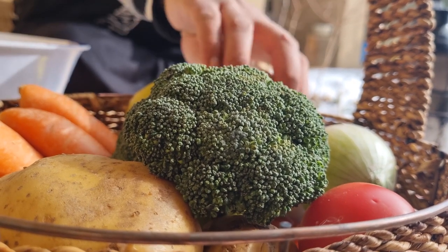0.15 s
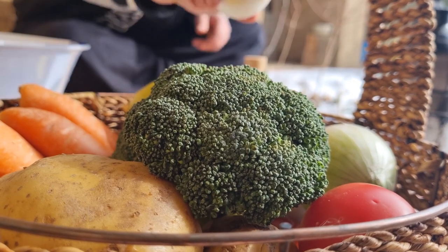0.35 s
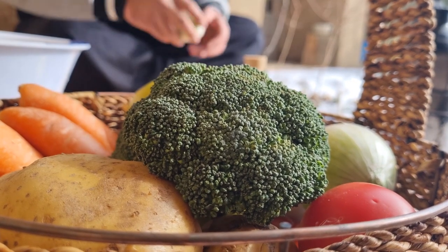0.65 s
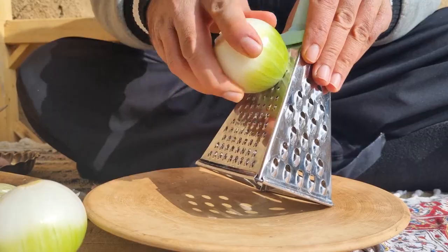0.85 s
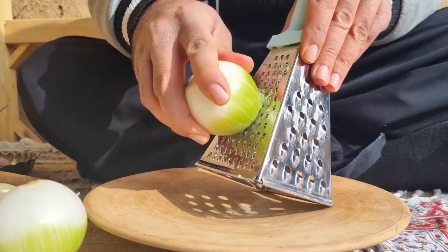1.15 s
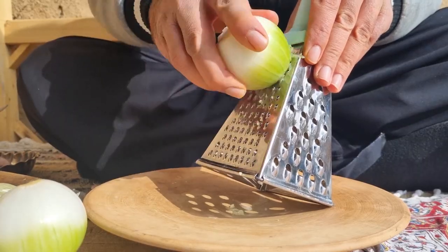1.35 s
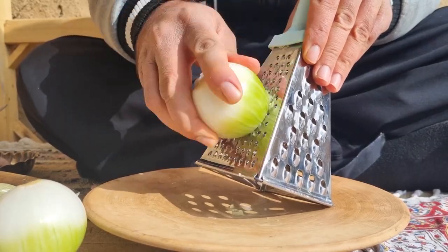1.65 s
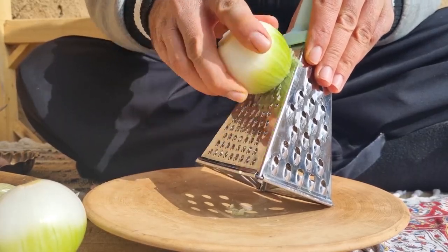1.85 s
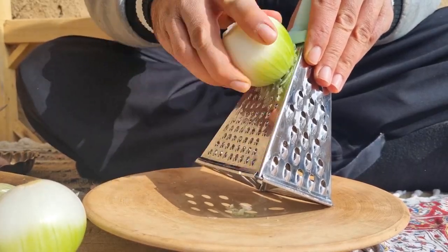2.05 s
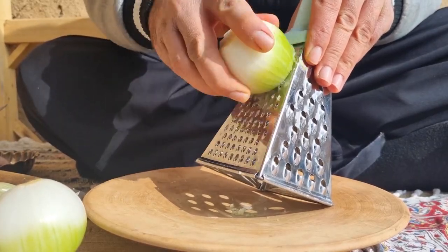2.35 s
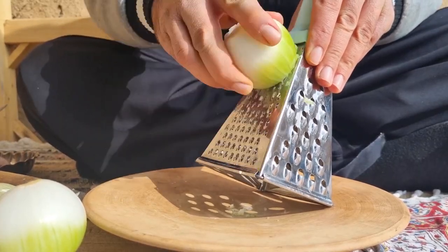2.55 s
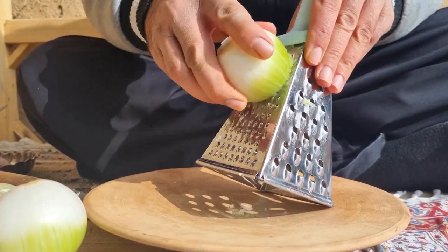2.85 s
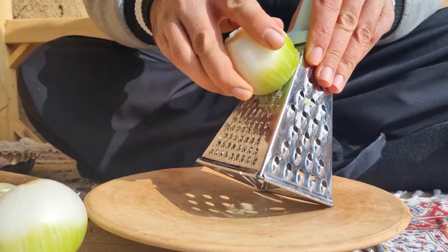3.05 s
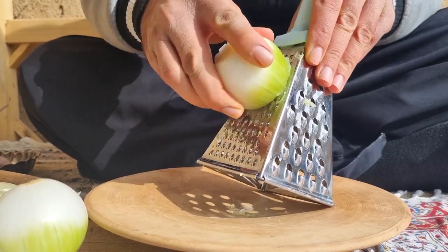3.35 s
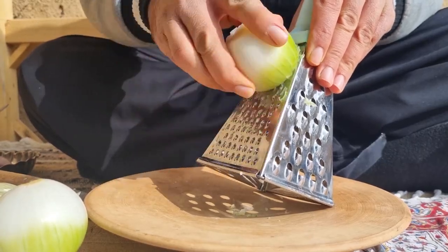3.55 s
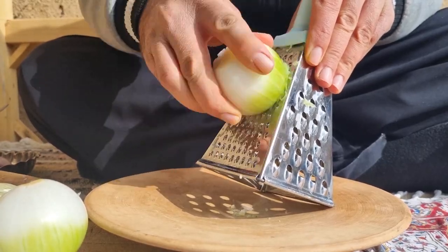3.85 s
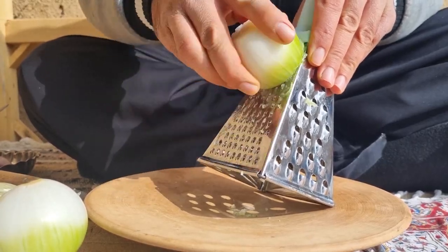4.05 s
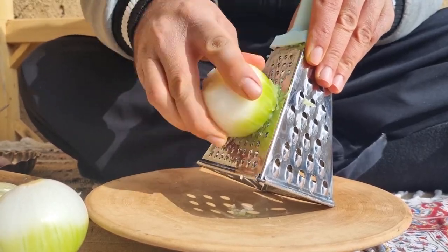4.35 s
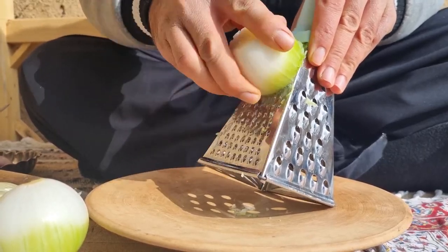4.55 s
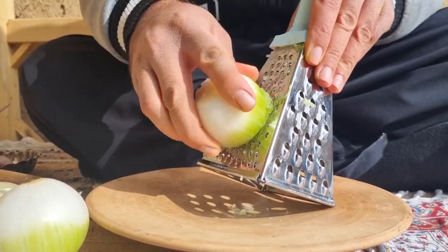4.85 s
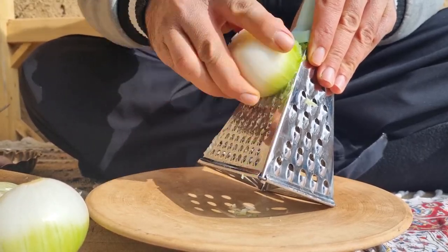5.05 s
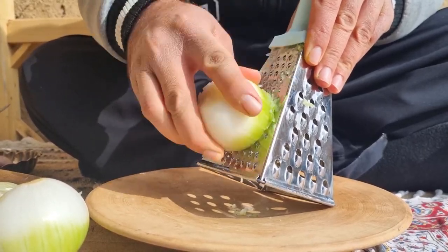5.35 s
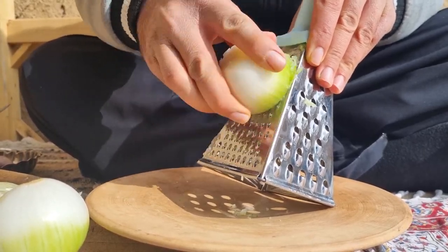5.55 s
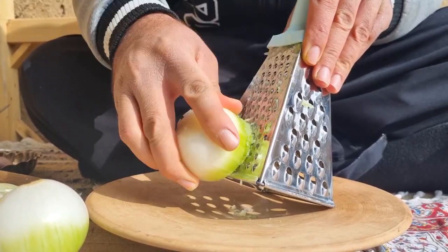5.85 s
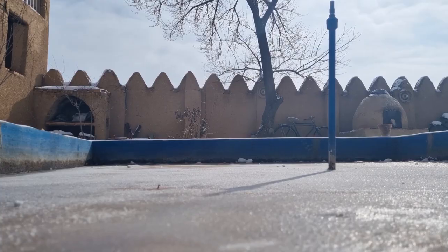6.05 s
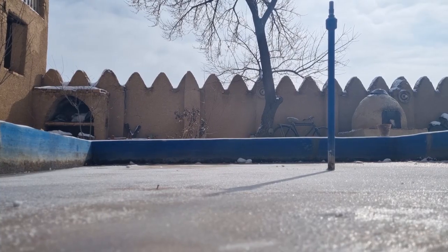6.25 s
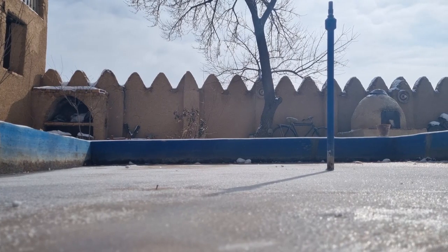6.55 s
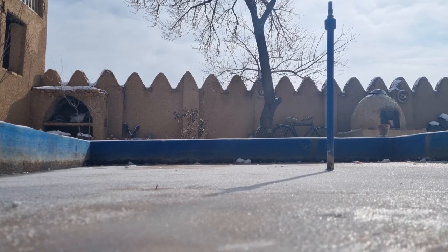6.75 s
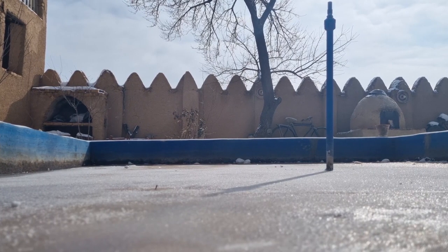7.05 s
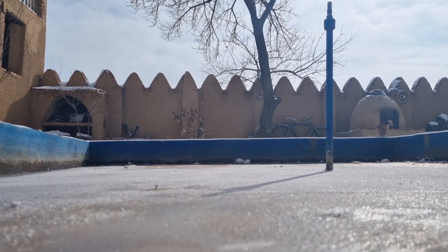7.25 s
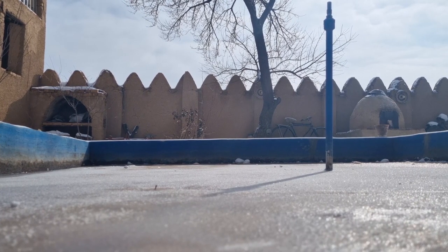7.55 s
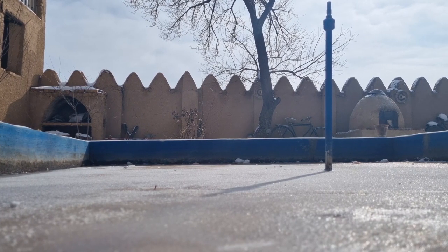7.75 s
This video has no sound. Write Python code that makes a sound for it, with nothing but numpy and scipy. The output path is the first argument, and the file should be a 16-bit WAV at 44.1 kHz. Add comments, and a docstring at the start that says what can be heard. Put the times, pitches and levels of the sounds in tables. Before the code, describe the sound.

For the first 0.9 seconds, vegetables are handled in a basket with a few light taps, dull knocks and small rustles, the clearest near 0.2 seconds, over a very quiet outdoor background. At about 0.9 seconds, much louder grating cuts in, close to the microphone. An onion is rubbed down and up a steel box grater in a steady rhythm of about four pushes a second, each followed by a lighter return. Every stroke is a short, dense, wet rasping hiss, with some ring from the metal and a hollow note from inside the box. A wooden plate underneath rocks with soft low thuds. Just before 6 seconds the close grating cuts off. The same rhythm continues very faintly and far away as dull swells of rumble and hiss, dying out at around 7.7 seconds over a soft outdoor rumble.

```python
"""Light taps and rustles come first, from vegetables handled in a basket over a quiet outdoor floor.
Then the sound of an onion rubbed down and up a steel box grater cuts in mid-stroke, close to a phone.
Teeth tear the flesh in a dense hiss, the sheet and the air in the box resonate, and the wooden plate
beneath rocks. The close sound cuts out, and the same rhythm goes on faint and far."""
import sys
import numpy as np
from scipy import signal
from scipy.fft import rfft, irfft
from scipy.io import wavfile
from scipy.ndimage import uniform_filter1d

SR = 44100
rng = np.random.default_rng(int(sys.argv[2]) if len(sys.argv) > 2 else 0)


def wav_record(signal):
    """Record a signal, one row per channel, as 16-bit PCM in the file named by sys.argv[1]."""
    frames = np.transpose(np.atleast_2d(signal))
    bounded = np.clip(frames, -1, 1)
    # unit amplitude maps onto the largest positive 16-bit level
    quanta = np.round(bounded * 32767).astype(np.int16)
    wavfile.write(sys.argv[1], SR, quanta)


N = 348390
CUT_IN_S, CUT_OUT_S = .8818, 5.953  # span of the close grating


def undb(db):
    """Amplitude ratio of a level in decibels."""
    return np.exp(np.asarray(db) * (np.log(10) / 20))


def level(x, db):
    """Normalisation to an rms level."""
    return x * undb(db) / np.sqrt(np.mean(x ** 2))


def over_hz(points):
    """Frequency response: the gain of (Hz, dB) points at every FFT bin."""
    hz, db = np.transpose(points)
    return undb(np.interp(np.log(np.fft.rfftfreq(N, 1 / SR) + 1), np.log(hz), db))


def colour(x, points):
    """Spectral shaping, scaled to rms 1."""
    return level(irfft(rfft(x) * over_hz(points), N), 0)


def bands(x, centres_hz):
    """Complementary filtering: neighbouring bands that add up to the sound."""
    spectrum, octave = rfft(x), np.log2(np.fft.rfftfreq(N, 1 / SR) + 1)
    return [irfft(spectrum * np.interp(octave, np.log2(centres_hz), one), N)
            for one in np.eye(len(centres_hz))]


def ring(x, modes):
    """Modal superposition: parallel resonators of alternating sign, scaled to rms 1."""
    out = np.zeros(N)
    for k, (hz, width, db) in enumerate(modes):
        mode = signal.lfilter(*signal.iirpeak(hz, hz / width, SR), x)
        out += (-1) ** k * undb(db) * mode / np.sqrt(width)
    return level(out, 0)


def walk(per_s):
    """Random modulation: ramps between random values, with a spread near 1."""
    hold = int(SR / per_s)
    return 1.33 * uniform_filter1d(np.repeat(rng.standard_normal(N // hold + 1), hold), hold)[:N]


def clicks(per_s, spread_db):
    """Shot noise: clicks of uneven size at random times, as when cells burst."""
    bursts = rng.random(N) < per_s / SR
    return bursts * rng.standard_normal(N) * undb(spread_db * rng.standard_normal(N))


# Stereo width. Each row: frequency in Hz, gain of the side signal in dB.
SIDE_GAIN = [(100, -19), (700, -14.5), (1400, -4.5), (4400, -4), (8000, 1.5)]
# Stereo balance. Each row: frequency in Hz, left minus right in dB.
BALANCE = [(200, 2), (2400, 0.55), (4400, -1.5), (15000, -2)]

def ports(mid, side):
    """Spatial coherence: two microphone ports are alike in the bass, unrelated in the treble."""
    m, s = rfft(mid), rfft(side) * over_hz(SIDE_GAIN)
    lean = np.sqrt(over_hz(BALANCE))
    return irfft(np.array([(m + s) * lean, (m - s) / lean]), N)


def swings(t, jolts, swell_s, t60):
    """Damped oscillation: each jolt swells a low swing that dies away or is stopped by the next."""
    out, signs = np.zeros(N), rng.choice([-1, 1], len(jolts))
    following = [jolt[0] for jolt in jolts[1:]] + [t[-1]]
    for (s, db, hz), sign, next_s in zip(jolts, signs, following):
        near = slice(int((s - 2 * swell_s) * SR), int((s + t60) * SR))
        age = t[near] - t[near][0]
        swell = (1 - np.exp(-age / swell_s)) ** 2 * undb(-60 * age / t60)
        stopped = np.clip((next_s - t[near]) / (2 * swell_s), 0, 1)
        envelope = undb(db) * np.sqrt(2) * swell / swell.max() * stopped
        out[near] += sign * envelope * np.sin(2 * np.pi * hz * age)
    return out


# Taps on the vegetables. Each row: start in seconds, knock in dB, rustle in dB,
# seconds for the rustle to fall 20 dB.
BASKET_TAPS = [(0, -83, -62.5, 0.12), (0.092, -63.5, -71, 0.11), (0.184, -44, -60, 0.12),
               (0.269, -70, -66, 0.098), (.449, -83, -63, 0.088), (0.836, -86.5, -62, 0.043)]
# Jolts of the basket. Each row: time in seconds, level in dB, pitch in Hz.
BASKET_JOLTS = [(.075, -59, 70), (0.113, -46, 99), (0.204, -47, 93), (0.258, -40, 95.5), (0.338, -40, 85),
                (.38, -46, 50)]

def handling(t):
    """Impact and friction: taps give a dull knock and a rustle of skin, jolts swing the basket."""
    knock, rustle = np.zeros((2, N))
    for start, knock_db, rustle_db, rustle_s in BASKET_TAPS:
        age = np.maximum(t - start, 0)
        knock += undb(knock_db - 60 * age / 0.18) * (age > 0)
        rustle += undb(rustle_db - 20 * age / rustle_s) * (1 - np.exp(-age / 0.0023))
    # Spectra. Each row: frequency in Hz, relative level in dB.
    wood = [(60, -21.5), (200, 12.0), (400, 4), (700, -1), (1600, -8.0), (5000, -46.0)]
    skin = [(500, -53), (2000, -13), (3600, -1.5), (7500, -1.5), (9500, -18), (15000, -7.5)]
    mid, side = (knock * colour(rng.standard_normal(N), wood)
                 + rustle * colour(clicks(per_s=7900, spread_db=0.5), skin) for _ in range(2))
    return ports(mid + swings(t, BASKET_JOLTS, swell_s=0.0103, t60=0.14), side)


# Spectrum of the outdoor floor. Each row: frequency in Hz, relative level in dB.
AIR_SPECTRUM = [(20, -5), (44, -0.5), (113, -13), (460, -23.5), (9100, -30.5), (14300, -25), (16000, -22.5)]
# Its course. Each row: time in seconds, rumble gain in dB, hiss gain in dB.
AIR_GAINS = [(0, -56, -67), (.5, -64.5, -69), (5.96, -64, -69.5), (7.7, -52.5, -69.5), (7.9, -56.5, -72.5)]

def air(t):
    """Noise floor: a wavering outdoor rumble and thin microphone hiss."""
    times, rumble_db, hiss_db = np.transpose(AIR_GAINS)
    rumble_gain = undb(np.interp(t, times, rumble_db) + 2.3 * walk(3.4))
    hiss_gain = undb(np.interp(t, times, hiss_db) + .8 * walk(13))
    noises = (bands(colour(rng.standard_normal(N), AIR_SPECTRUM), [100, 400]) for _ in range(2))
    mid, side = (rumble_gain * low + hiss_gain * high for low, high in noises)
    return ports(mid, side)


# Strokes down, against the teeth. Each row: grip and release in seconds, hiss in dB,
# rocking of the plate at the catch and at the stop in dB.
DOWN_STROKES = [(0.942, 1.031, -21.5, -21, -17), (1.208, 1.284, -21, -25, -14.5),
                (1.452, 1.535, -22, -24.5, -21), (1.703, 1.785, -22.5, -30, -18.5),
                (1.956, 2.035, -21.5, -14.5, -15.5), (2.199, 2.284, -22, -16.5, -21.5),
                (2.446, 2.536, -23.5, -13.5, -24), (2.694, 2.787, -22.5, -20.5, -21),
                (2.947, 3.022, -22.5, -25.5, -26), (3.192, 3.273, -22, -29, -17),
                (3.43, 3.525, -23, -20.5, -18.5), (3.685, 3.769, -22.5, -19.5, -20.5),
                (3.931, 4.015, -22.5, -18.5, -17), (4.172, 4.256, -22, -20.5, -24),
                (4.414, 4.493, -22.5, -19.5, -20.5), (4.656, 4.744, -22, -18, -20),
                (4.908, 4.997, -23, -18.5, -17), (5.153, 5.233, -24, -23, -19.5),
                (5.393, 5.476, -24.5, -18, -27.5), (5.64, 5.715, -23, -16.5, -21.5),
                (5.873, 5.946, -22, -25, -25)]
# Lighter strokes up. Each row: grip and release in seconds, hiss in dB, rocking at the turn in dB.
UP_STROKES = [(0.879, 0.905, -23.5, -30.5), (1.076, 1.17, -30.5, -35), (1.334, 1.41, -25, -25),
              (1.586, 1.659, -27, -29.5), (1.838, 1.916, -28.5, -30.5), (2.084, 2.16, -28, -32.5),
              (2.327, 2.408, -28.5, -27), (2.582, 2.656, -30, -32), (2.828, 2.905, -27.5, -32.5),
              (3.069, 3.149, -28.5, -32.5), (3.326, 3.396, -29.5, -32), (3.561, 3.645, -27.5, -32),
              (3.812, 3.887, -26.5, -28.5), (4.059, 4.125, -26.5, -18.5), (4.303, 4.37, -27.5, -21.5),
              (4.537, 4.613, -28, -32), (4.782, 4.863, -27, -34), (5.036, 5.11, -28, -24),
              (5.28, 5.348, -27, -27), (5.523, 5.597, -31.5, -33), (5.759, 5.835, -30, -28.5)]

def strokes():
    """Reciprocating motion: pushes and returns in order of time."""
    # Each row: grip and release in seconds, hiss, its change over the stroke and sheet drive
    # over hiss in dB, knock delay in seconds, knock in dB.
    down = [(*row[:3], -1.5, -3.3, 0.028, 4) for row in DOWN_STROKES]
    up = [(*row[:3], -0.7, -6, 0.014, 5) for row in UP_STROKES]
    return sorted(down + up)


def pressure(t):
    """Contact force drives hiss and sheet: the onion slides in, the teeth bite, hold and let go."""
    hiss, sheet = np.zeros((2, N))
    for grip, release, hiss_db, fade_db, sheet_db, knock_s, knock_db in strokes():
        near = slice(int((grip - .06) * SR), int((release + .06) * SR))
        s, quarter = t[near], (release - grip) / 4
        bite_db = -2.5 * (1 + np.tanh((grip - s) / 0.00082)) - 5 * np.logaddexp(0, (grip - s) / 0.0058)
        hold_db = hiss_db + fade_db * np.interp(s, [grip + quarter, release - quarter], [-.5, .5])
        let_go_db = -9 * np.logaddexp(0, (s - release) / 0.0063)
        stroke_db = bite_db + hold_db + let_go_db
        hiss[near] += undb(stroke_db)
        rise_db = 0.7 * (grip - CUT_IN_S)  # the sheet gains on the hiss as the grating goes on
        catch_db = knock_db * np.exp(-((s - grip - knock_s) / .013) ** 2)  # the first teeth knock it
        sheet[near] += undb(stroke_db + sheet_db + rise_db + catch_db)
    return hiss, sheet


def steel(x, t60):
    """Dense modes act as a decaying noise response, new for each stroke as the onion's place differs."""
    age = np.arange(int(t60 * SR)) / SR
    tails = rng.standard_normal((len(strokes()), len(age))) * undb(-60 * age / t60)
    turns = [0] + [int(stroke[1] * SR) for stroke in strokes()[:-1]] + [int(CUT_OUT_S * SR)]
    out = np.zeros(N)
    for a, b, tail in zip(turns, turns[1:], tails):
        out[a:b + len(tail) - 1] += signal.fftconvolve(x[a:b], tail / np.sqrt(np.sum(tail ** 2)))
    return out


# Spectrum of tearing flesh. Each row: frequency in Hz, relative level in dB.
TEAR_SPECTRUM = [(530, -28), (900, -7), (1470, -9.5), (1640, -16.5), (1850, -6.5), (2470, -11.5),
                 (3000, -5.5), (4460, -2.5), (7580, -6.5), (8980, -13), (11400, -15), (15100, -9.5),
                 (16000, -19)]

def tearing(drive, band_gains):
    """Fracture noise: bursting cells merge into a hiss that rings on in the steel."""
    cells = colour(clicks(per_s=30000, spread_db=0.5), TEAR_SPECTRUM) * drive
    centres_hz = np.geomspace(1000, 14000, len(band_gains))
    tear = sum(gain * band for gain, band in zip(band_gains, bands(cells, centres_hz)))
    return undb(-0.5) * (tear + 0.5 * steel(tear, t60=.06))


# Low modes of the steel sheet. Each row: frequency in Hz, bandwidth in Hz, relative level in dB.
SHEET_MODES = [(245.8, 33, -1.5), (323.8, 52, -2), (435, 110, -9.5), (635, 230, -7), (812.4, 35, -5.5),
               (940, 76, -7), (1175, 95, -16)]

def sheet_ring(drive):
    """Impulse excitation: the tearing rings the bending modes of the sheet."""
    return level(ring(clicks(per_s=3000, spread_db=3.5) * drive, SHEET_MODES), -32)


# Air mode of the box. The row: frequency in Hz, bandwidth in Hz, relative level in dB.
BOX_MODE = [(525, 27, 0)]
# Shreds fill the box and dull it. Each row: time in seconds, gain in dB.
BOX_GAIN = [(1, -32), (5, -37)]

def box_air(t, drive):
    """Cavity resonance: the air inside the box answers the tearing with a hollow note."""
    hollow = ring(clicks(per_s=660, spread_db=4.5) * drive, BOX_MODE)
    return hollow * undb(np.interp(t, *np.transpose(BOX_GAIN)))


# Modes of the wooden plate. Each row: frequency in Hz, bandwidth in Hz, relative level in dB.
PLATE_MODES = [(54, 12, -6.5), (74, 25, -2.5), (99.5, 36, 2), (147.7, 48, -3)]

def plate_shake(drive):
    """Forced vibration: the drag shakes the plate."""
    return level(ring(rng.standard_normal(N) * (drive + undb(-42)), PLATE_MODES), -29.5)


def plate_rock(t, catch_hz=104.6, stop_hz=101.4, turn_hz=97, spread_hz=6.0):
    """Free vibration: the plate tips when a push catches, when it stops and when the hand turns."""
    catches = [(grip + 0.018, db, catch_hz) for grip, _, _, db, _ in DOWN_STROKES]
    stops = [(release - 0.013, db, stop_hz) for _, release, _, _, db in DOWN_STROKES]
    turns = [(release + 0.008, db, turn_hz) for _, release, _, db in UP_STROKES]
    thuds = [(s, db, hz + spread_hz * rng.standard_normal())
             for s, db, hz in sorted(catches + stops + turns)]
    return swings(t, thuds, swell_s=.006, t60=0.2)


def grater(t):
    """Source and resonators: the same strokes drive the tearing, the sheet, the box and the plate."""
    hiss, sheet = pressure(t)
    tear_drive = hiss * undb(0.91 * walk(70))  # rows of teeth catch unevenly
    # Wet clumps shift the colour as they pass; as the onion slows, the treble dies first.
    band_gains = [undb(1.4 * walk(25)) * (hiss * undb(25.5) + 1e-4) ** tilt
                  for tilt in np.linspace(-.15, .15, 6)]
    sheet_drive = sheet * undb(2.0 * walk(30))  # the sheet is shaken in jerks
    # The box speaks unevenly, and almost as readily on the light return as on the push.
    box_drive = sheet ** 0.63 * undb(1.7 * walk(22)) * (hiss > undb(-41))
    mid, side = (tearing(tear_drive, band_gains) + sheet_ring(sheet_drive)
                 + box_air(t, box_drive) + plate_shake(sheet) for _ in range(2))
    # Sound reaches the ports by different paths round the steel, so the side partly follows the mid.
    shared = steel(mid, t60=0.0017)
    return ports(mid + plate_rock(t), 0.3 * shared + 0.9 * side)


# Distant pushes. Each row: middle in seconds, rumble in dB, hiss in dB.
FAR_PUSHES = [(6.048, -42.5, -61.5), (6.319, -44.5, -60.5), (6.57, -44, -60.5), (6.81, -44.5, -62),
              (7.05, -43.5, -61.5), (7.31, -45, -62.5), (7.71, -54.5, -89.5)]
# Spectra of their rumble and hiss. Each row: frequency in Hz, relative level in dB.
FAR_RUMBLE_SPECTRUM = [(25, -32), (60, 2), (108, 3), (220, -14), (320, -22.5), (500, -36), (700, -64)]
FAR_HISS_SPECTRUM = [(300, -31), (600, -3.5), (1080, -2.5), (1600, -11), (4500, -5.5), (7500, -5),
                     (9500, -19)]

def far_strokes(t, rise_s=0.042, fall_s=0.08):
    """Attenuation with distance: a rumble and a dull, wide hiss swell faintly with each stroke."""
    rumble, hiss = np.zeros((2, N))
    for middle, rumble_db, hiss_db in FAR_PUSHES:
        width_s = np.where(t < middle - .02, rise_s, fall_s)
        push = np.exp(-((t - middle + 0.018) / width_s) ** 2)
        return_before = undb(-10) * np.exp(-((t - middle + 0.13) / 0.05) ** 2)
        rumble += undb(rumble_db) * (push + return_before)
        hiss += undb(hiss_db) * (push + return_before)
    wide = np.array([colour(rng.standard_normal(N), FAR_HISS_SPECTRUM) for _ in range(2)])
    low = ports(rumble * colour(rng.standard_normal(N), FAR_RUMBLE_SPECTRUM), np.zeros(N))
    return (t > CUT_OUT_S) * (low + hiss * wide)


def scene():
    """Superposition: taps, abruptly gated close grating and far strokes over the outdoor floor."""
    t = np.arange(N) / SR
    gate = np.clip((t - CUT_IN_S) / 0.0026, 0, 1) * np.clip((CUT_OUT_S - t) / 0.0051 + 1, 0, 1)
    grating = gate * grater(t)
    return handling(t) + grating + far_strokes(t) + air(t)


def record(dry, bottom_hz=30., top_hz=15800):
    """Band limiting: the phone thins the deepest bass and cuts the top."""
    thin = signal.sosfilt(signal.butter(2, bottom_hz, "high", fs=SR, output="sos"), dry)
    return signal.sosfilt(signal.ellip(10, .2, 75, top_hz, fs=SR, output="sos"), thin)


dry = scene()
out = record(dry)
wav_record(out)
```